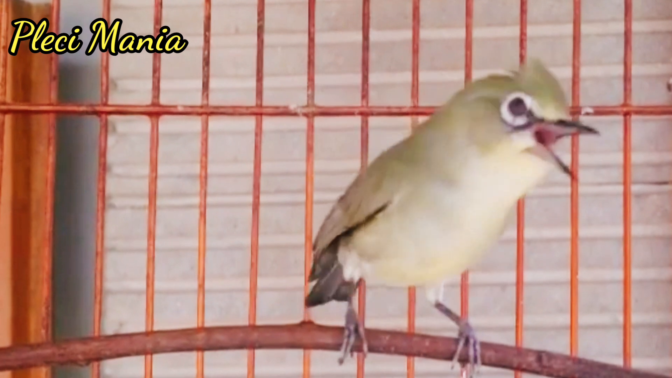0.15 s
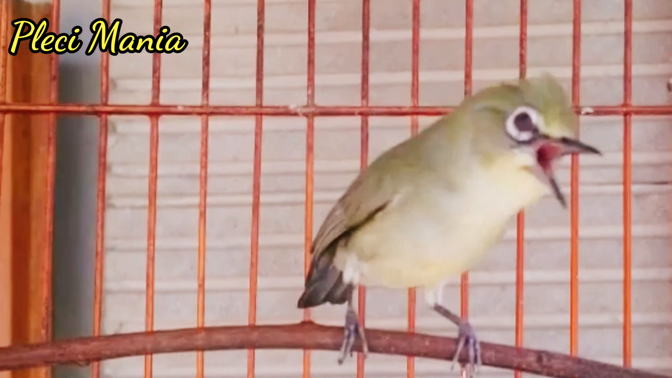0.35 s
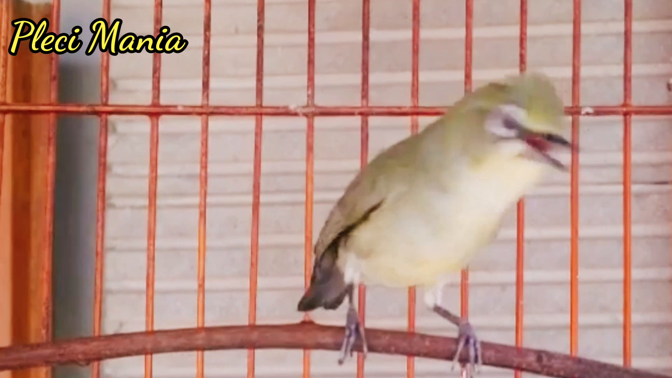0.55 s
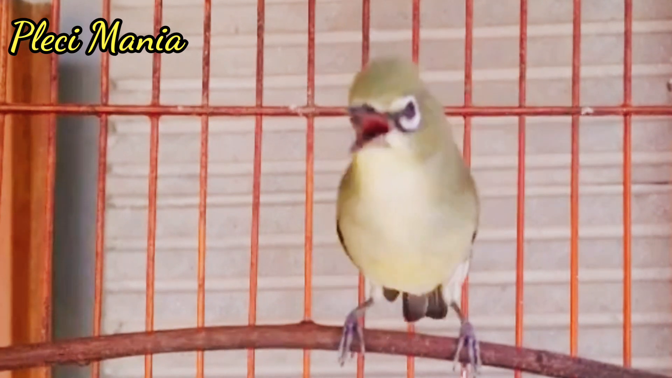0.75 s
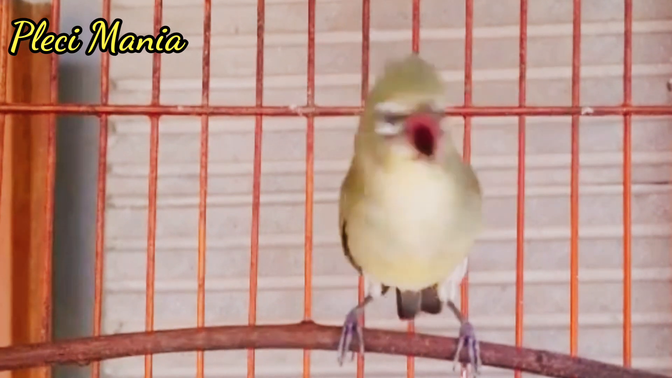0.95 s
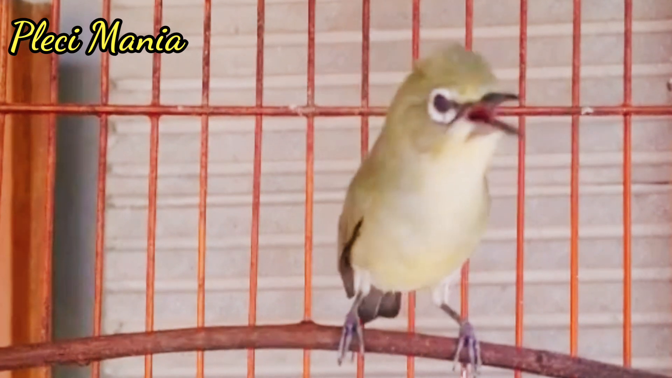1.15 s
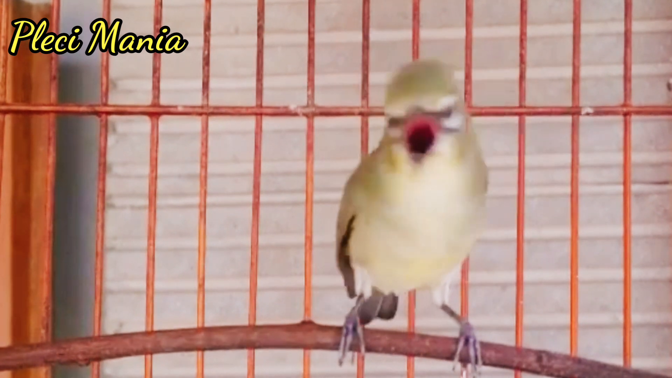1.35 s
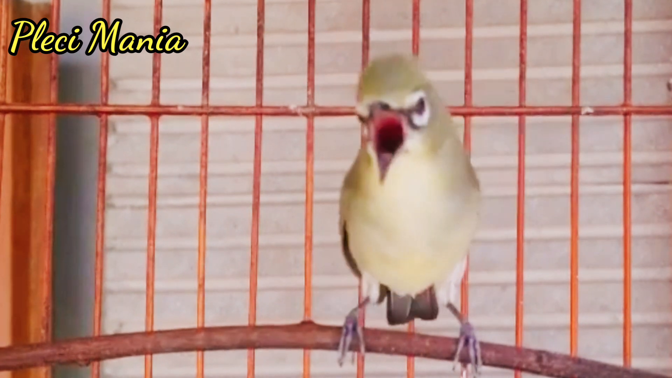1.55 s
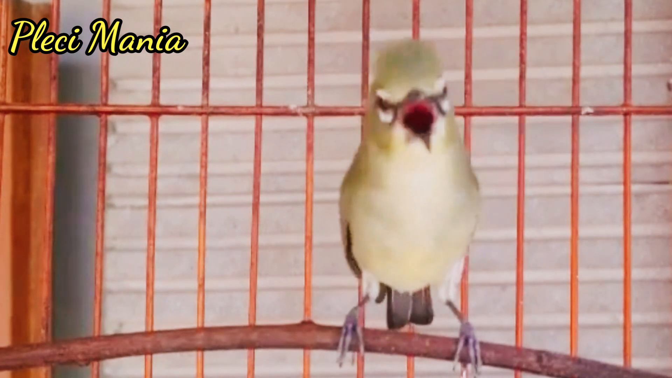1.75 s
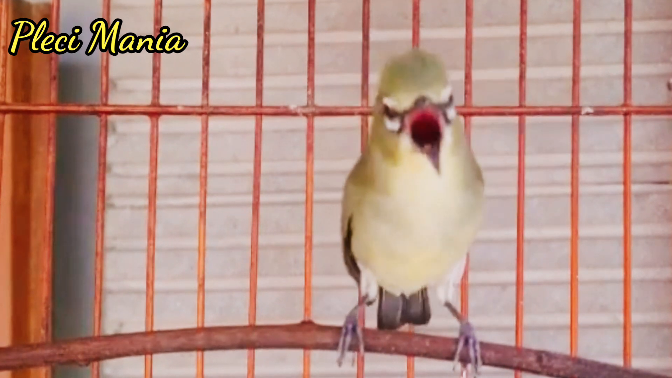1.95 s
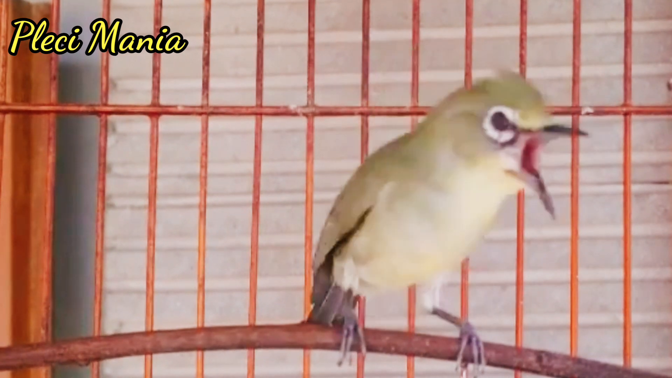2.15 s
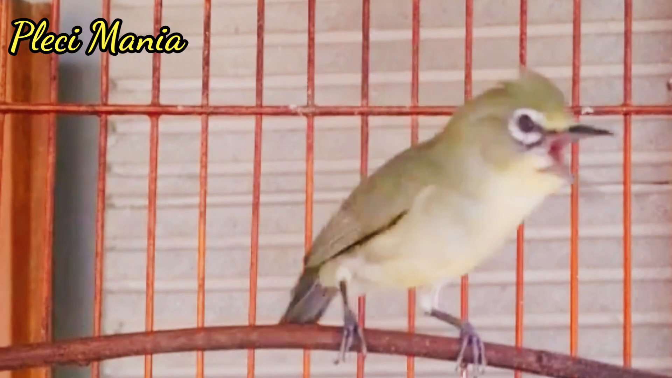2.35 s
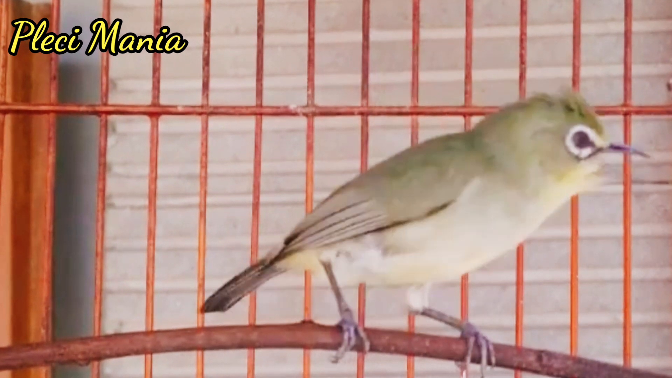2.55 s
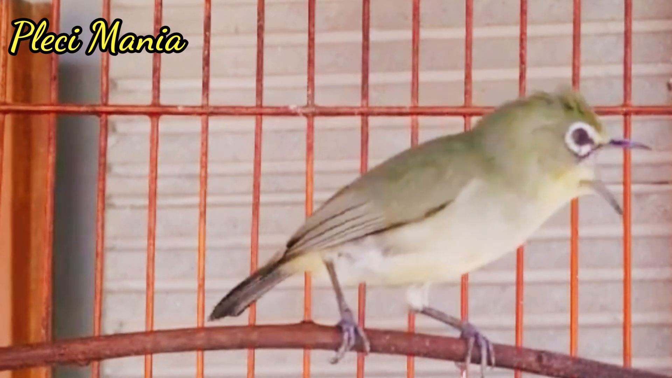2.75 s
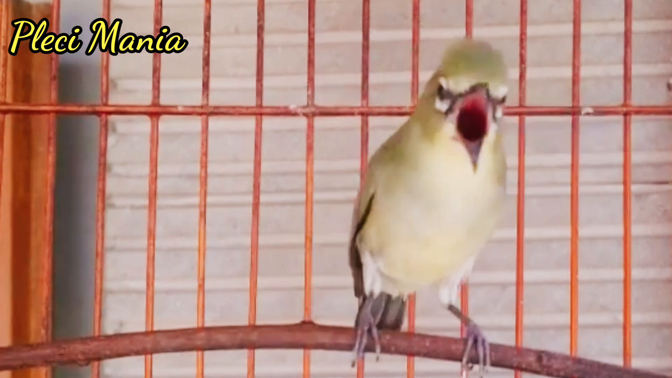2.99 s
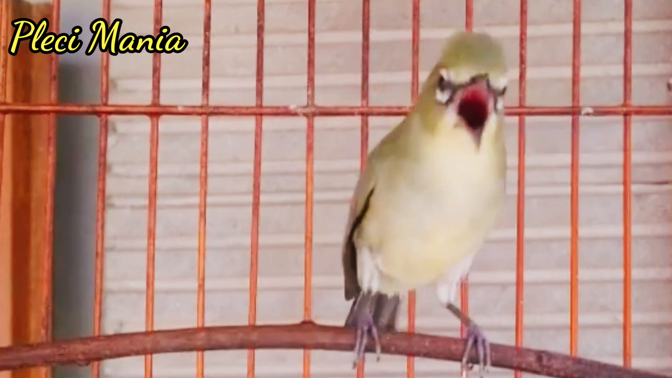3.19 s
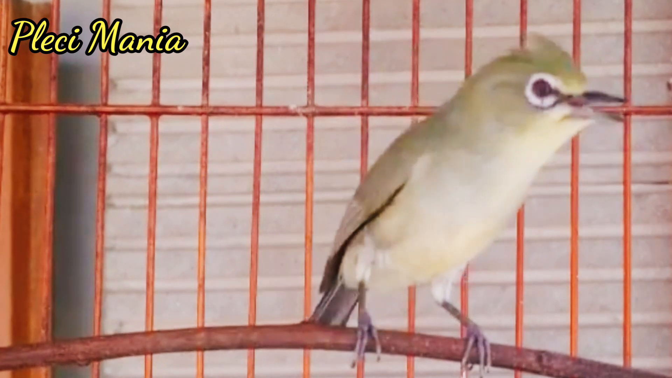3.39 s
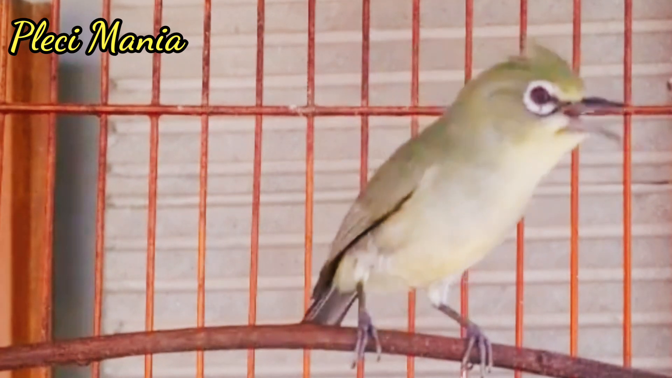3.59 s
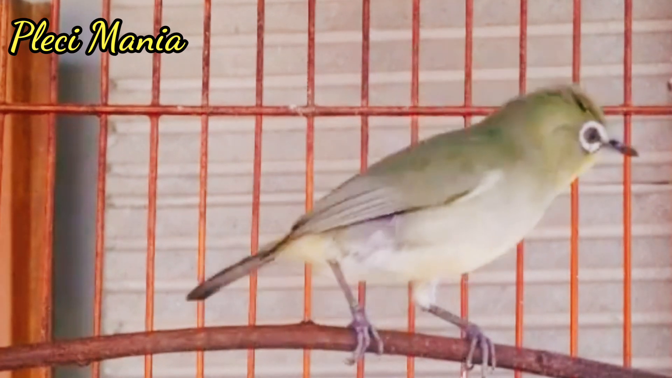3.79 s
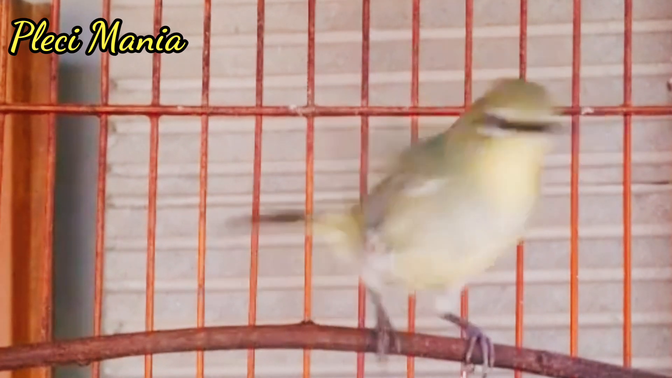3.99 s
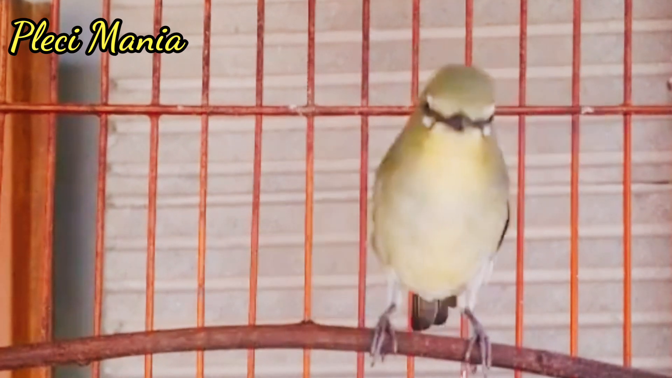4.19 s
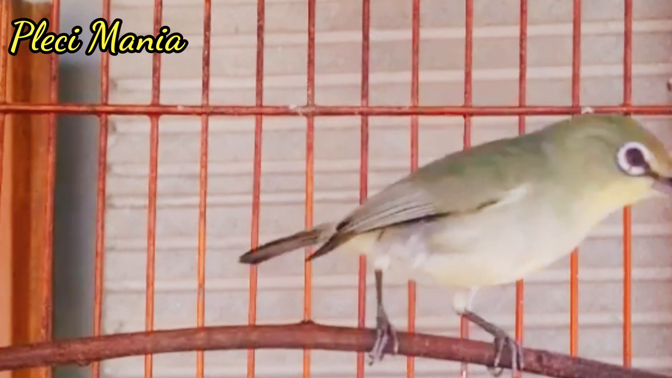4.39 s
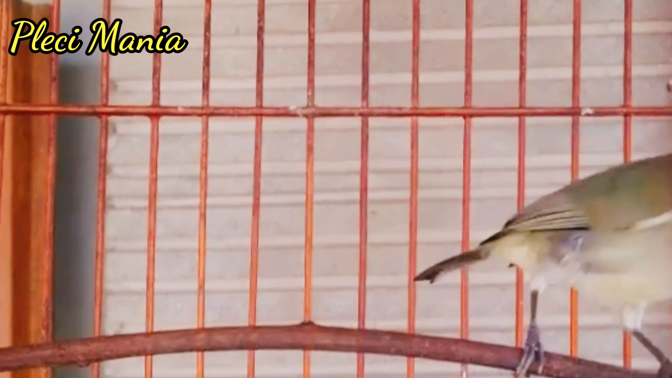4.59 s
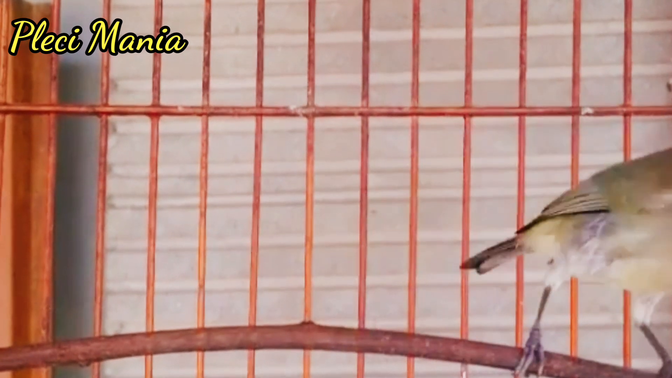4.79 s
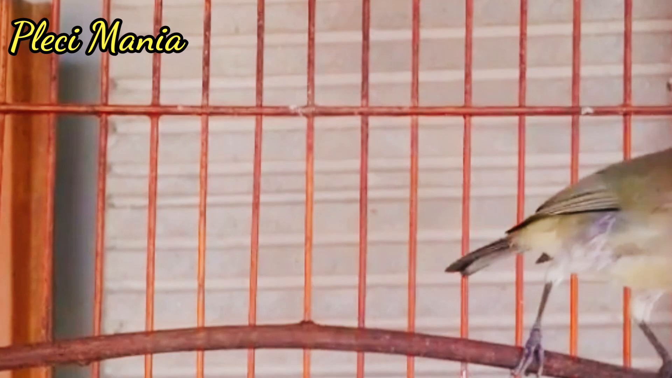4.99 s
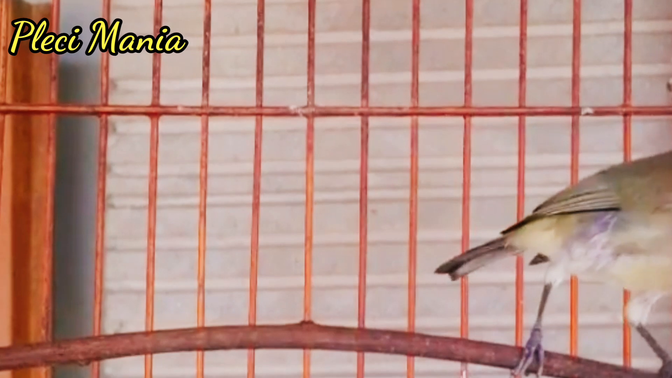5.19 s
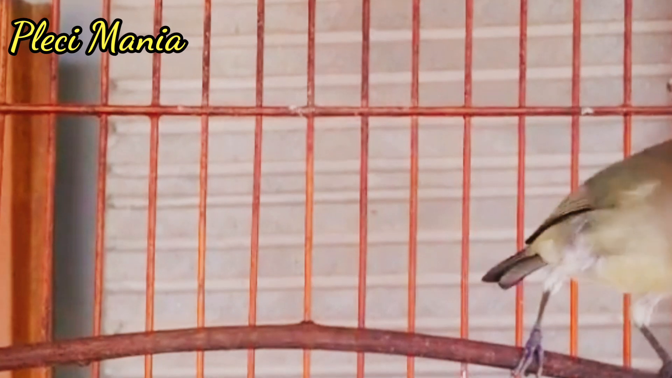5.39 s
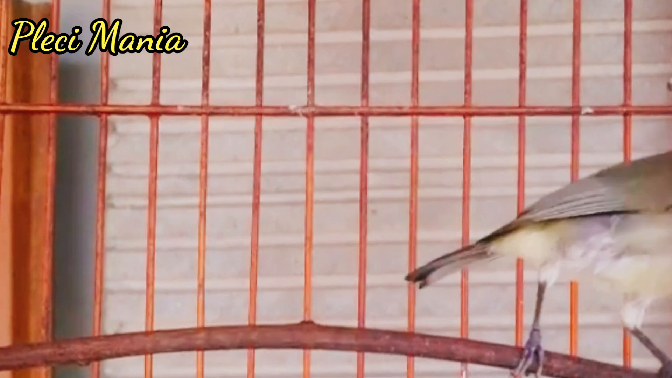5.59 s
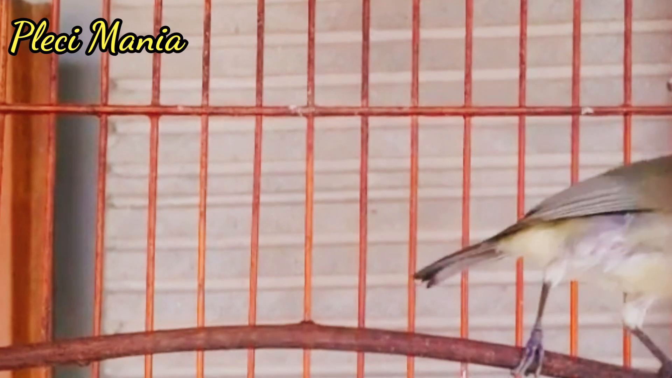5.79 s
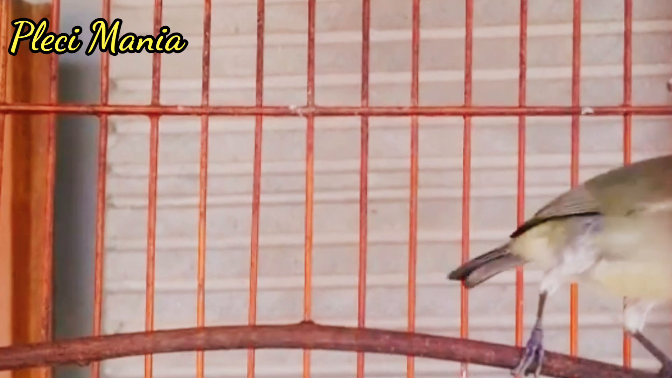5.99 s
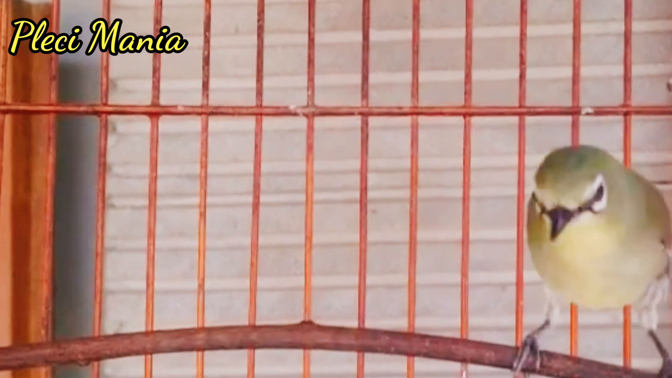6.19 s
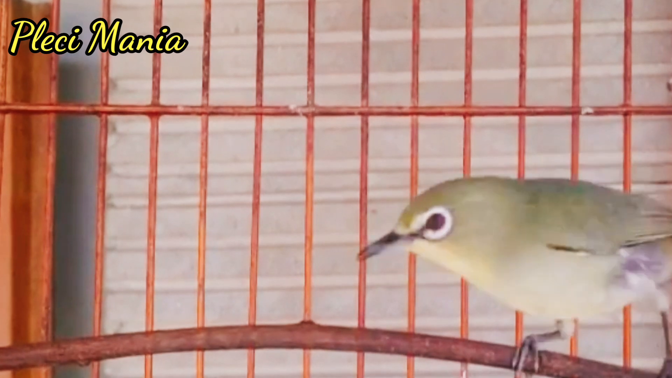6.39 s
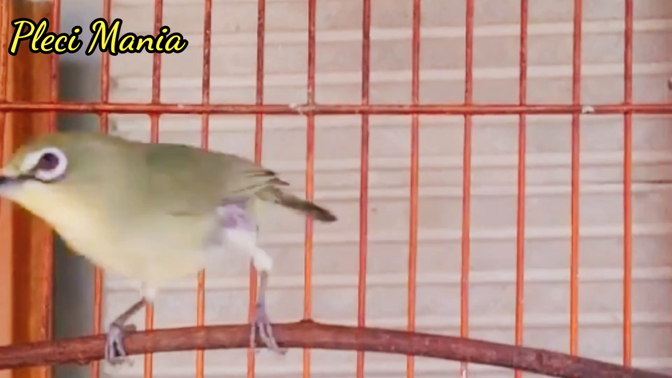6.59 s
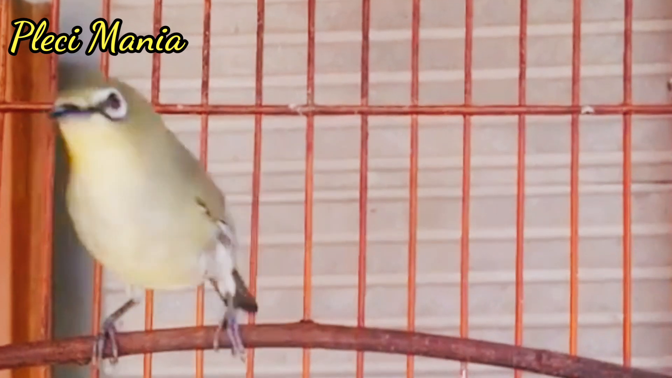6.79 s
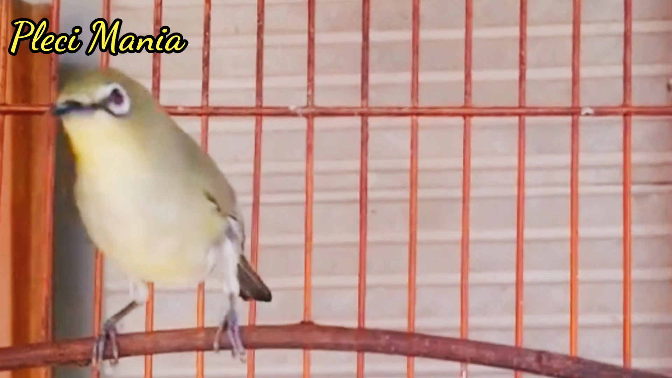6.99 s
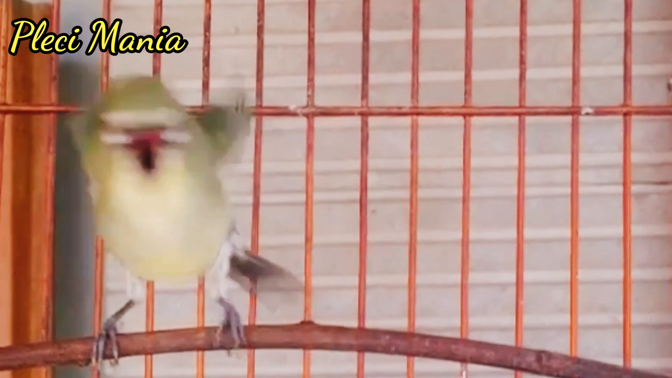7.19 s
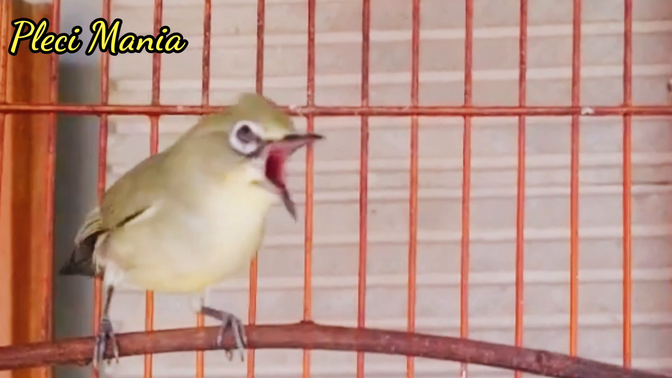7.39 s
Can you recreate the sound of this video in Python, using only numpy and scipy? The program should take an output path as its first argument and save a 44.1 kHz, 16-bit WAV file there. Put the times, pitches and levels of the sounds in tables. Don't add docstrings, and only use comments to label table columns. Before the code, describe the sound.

Quick piercing bird whistles swoop downward for almost four seconds, then quiet street hum, faraway chirps and soft wing flicks before one new note.

```python
import sys
import numpy as np
from scipy import signal
from scipy.fft import rfft, irfft, next_fast_len
from scipy.io import wavfile
from scipy.ndimage import uniform_filter1d

SR = 44100
rng = np.random.default_rng(int(sys.argv[2]) if len(sys.argv) > 2 else 0)


def digitize_waveform(pressure):
    field = np.atleast_2d(pressure).T
    bounded = np.clip(field, -1, 1)
    quanta = np.round(bounded * 32767).astype(np.int16)
    wavfile.write(sys.argv[1], SR, quanta)


def makeup_ratio(level_db):
    decades = np.asarray(level_db, float) / 20
    return 10 ** decades


N = 328545
TIME = np.arange(N) / SR
FAST = next_fast_len(N)
BINS = np.fft.rfftfreq(FAST, 1 / SR)
PORT_LAG_S = .00041


def on_log(table, hz):
    f, *columns = np.transpose(table)
    log_hz = np.log(np.maximum(hz, 1))
    return [np.interp(log_hz, np.log(f), column) for column in columns]


def walk(rate):
    hold = int(SR / rate)
    levels = rng.standard_normal(N // 20)[:N // hold + 1]
    smooth = uniform_filter1d(uniform_filter1d(np.repeat(levels, hold), hold), hold)
    return 1.3 * smooth[:N]


def bird():
    # [onset t/s, opening f/Hz, top of the opening flick f/Hz]
    openings = [(.204, 3300, 9300), (.432, 9000, 8800), (.632, 3200, 7800), (.824, 2900, 7600),
                (.975, 2900, 6100), (1.11, 3300, 7500), (1.284, 2700, 3000), (1.491, 9400, 8900),
                (1.702, 2900, 6900), (1.871, 3000, 3200), (2.076, 9600, 9000), (2.315, 2900, 9000),
                (2.519, 2900, 7500), (2.767, 3600, 8200), (2.945, 3300, 7000), (3.176, 3000, 7200),
                (3.387, 3000, 6800), (3.645, 3000, 9000), (7.383, 3000, 8000)]
    # [start level/dB, change to the end/dB, extra swell in the middle/dB]
    breaths = [(-13.5, -1, -2.5), (-18, -2.5, 4.5), (-15.5, 1, -3), (-20, 4, 4), (-14, -7.5, -.5),
               (-16, -4.5, 1.5), (-18, -4, 2.5), (-17.5, -2.5, 2), (-14.5, 1, -2), (-15, -4, -1.5),
               (-15.5, -7, 2), (-19, 3.5, 1.5), (-18, -8.5, 6), (-25, -4, 9), (-21.5, 3, 3.5),
               (-19.5, -7, 8.5), (-16.5, -7, 5), (-15, -5, 0), (-16, 0, 0)]
    # [left minus right level/dB, left leads by phase/rad]
    beak = [(-.7, -1.6), (-.5, -1.6), (-.1, -1.65), (2.2, -.05), (2, -.2), (.7, -.5), (-1.3, -1.1),
            (.8, -.4), (1.5, .05), (1, -.1), (.7, -.27), (-1, -1.55), (-4.2, -2.3), (-5, -3), (-2, -1.55),
            (.7, -.9), (-.7, -1.5), (-1.5, -2.15), (3, .9)]
    # [t/s, whistle f/Hz]
    early = [
        [(0.218, 7820), (0.235, 7060), (0.242, 6050), (0.26, 5430), (0.343, 4590), (0.365, 4650)],
        [(0.442, 8310), (0.457, 7320), (0.487, 7080), (0.495, 6180), (0.506, 5900), (0.528, 6090),
         (0.538, 5190), (0.559, 4870), (0.588, 5020)],
        [(0.639, 7600), (0.648, 6760), (0.659, 6550), (0.666, 5300), (0.692, 4970), (0.702, 4440), (0.74, 3940),
         (0.763, 4130)],
        [(0.833, 7710), (0.836, 7300), (0.85, 6800), (0.861, 5880), (0.879, 5280), (0.885, 5790), (0.893, 4840),
         (0.939, 4090)],
        [(0.983, 6400), (0.99, 6140), (0.995, 5560), (1.0, 5620), (1.006, 4800), (1.035, 3850), (1.059, 3640)],
        [(1.118, 6910), (1.127, 6270), (1.131, 6460), (1.141, 5170), (1.181, 5150), (1.187, 4540),
         (1.201, 4590), (1.209, 4090), (1.232, 4180)],
    ]
    # [t/s, whistle f/Hz]
    middle = [
        [(1.292, 3230), (1.313, 4110), (1.349, 4220), (1.354, 4610), (1.367, 4670), (1.383, 4200),
         (1.392, 5170), (1.403, 5400), (1.415, 4840)],
        [(1.512, 7560), (1.517, 7470), (1.529, 5880), (1.539, 5770), (1.543, 5250), (1.618, 4200),
         (1.633, 4160)],
        [(1.711, 7150), (1.737, 6240), (1.743, 5640), (1.766, 5210), (1.774, 5710), (1.789, 5360),
         (1.793, 4780), (1.804, 4590), (1.818, 3960)],
        [(1.879, 3250), (1.889, 3510), (1.893, 4010), (1.934, 4010), (1.944, 4690), (1.959, 4780),
         (1.979, 4090), (1.989, 5320), (1.999, 5100)],
        [(2.09, 8230), (2.105, 7280), (2.114, 5940), (2.124, 5810), (2.131, 5230), (2.216, 4110)],
        [(2.329, 7430), (2.339, 6500), (2.35, 6220), (2.357, 6520), (2.361, 7820), (2.44, 5100), (2.455, 4330)],
    ]
    # [t/s, whistle f/Hz]
    late = [
        [(2.53, 7900), (2.551, 6930), (2.562, 5000), (2.604, 4180), (2.622, 4200), (2.628, 5380), (2.648, 5770),
         (2.655, 5060), (2.68, 4900)],
        [(2.776, 7800), (2.792, 7260), (2.811, 5580), (2.815, 6270), (2.819, 6270), (2.828, 5660),
         (2.863, 4890), (2.871, 5250), (2.881, 5170)],
        [(2.953, 7300), (2.954, 7080), (2.974, 6910), (2.976, 6220), (2.99, 5620), (3.025, 5060), (3.033, 5380),
         (3.085, 4260), (3.09, 4390)],
        [(3.187, 8400), (3.207, 7040), (3.212, 7170), (3.22, 6120), (3.226, 5770), (3.247, 5920), (3.254, 5250),
         (3.311, 4180)],
        [(3.395, 6850), (3.4, 6330), (3.442, 5210), (3.459, 5320), (3.468, 6310), (3.479, 6090), (3.495, 5280),
         (3.526, 4480), (3.548, 4370)],
        [(3.663, 7800), (3.674, 7670), (3.681, 6870), (3.689, 6500), (3.782, 5020)],
        [(7.392, 7920), (7.402, 7770), (7.415, 6440), (7.43, 5860), (7.47, 5500)],
    ]
    # [f/Hz, left minus right level/dB, left leads by phase/rad]
    port_differences = [(3700, 3, -.5), (4250, 6.5, -.5), (4750, 3, -.7), (5250, 1, -.3), (5750, -2, .2),
                        (6150, 2, 1.0), (6500, 4, .6), (6850, 1, -.5), (7250, -5.5, .2), (7700, 3.5, 1.2),
                        (9000, -1, 1.2), (12000, -3, 2.2)]
    # [whistle f/Hz, level/dB]
    undertone = [(3500, -62), (5500, -60), (7400, -42), (8200, -14), (9000, -3)]
    # [multiple of the whistle, level/dB]
    overtones = [(2, -37), (3, -44)]
    flick_s, flick_knee = .006, .24
    fade_s = .003
    out = np.zeros((2, N))
    side = np.array([[.5], [-.5]])
    waver = 1 + .007 * walk(220)
    flutter_db = 1.5 * walk(130)
    rasp = walk(900)
    broken_db = 3.5 * walk(90)
    trill_hz = 92 * (1 + .1 * walk(30))
    trill = 1 + .032 * np.sin(2 * np.pi * np.cumsum(trill_hz) / SR)
    for n, (opening, breath, tune, heading) in enumerate(zip(openings, breaths, early + middle + late, beak)):
        onset_s, from_hz, top_hz = opening
        turn_db, turn_rad = heading
        knee_hz = from_hz + flick_knee * (top_hz - from_hz)
        flick_points = [(onset_s, from_hz), (onset_s + flick_s / 2, knee_hz), (onset_s + flick_s, top_hz)]
        s, hz = np.transpose(flick_points + list(tune))
        end_s = s[-1]
        at = slice(int(onset_s * SR), min(int((end_s + fade_s) * SR), N))
        t = TIME[at]
        hz = uniform_filter1d(np.interp(t, s, hz), size=60)
        flick = np.clip(np.gradient(hz) / 12, 0, 1) * np.exp(-(t - onset_s) / .02)
        gain = np.sqrt(2) * makeup_ratio(effort(t, hz, onset_s, end_s, *breath) + flutter_db[at])
        gain *= np.clip((end_s + fade_s - t) / fade_s, 0, 1)
        gain *= np.clip((t - onset_s) / .002, 0, 1)
        hz = hz * waver[at]
        if n in (6, 9):
            hz *= trill[at] ** np.exp(-((hz - 4000) / 350) ** 2)
        phase = 2 * np.pi * np.cumsum(hz) / SR
        under_db = on_log(undertone, hz)[0]
        partials = [(1, 0), (.5, under_db), (1.5, np.maximum(under_db - 15, -60))] + overtones
        for k, part_db in partials:
            pan_db, lead = on_log(port_differences, k * hz)
            weak = k != 1
            wobble = (weak * (.38 + .38 * k) + 1.2 * flick) * rasp[at]
            weak_db = weak * (broken_db[at] - 9 * flick * (k > 1))
            size = gain * makeup_ratio(part_db + weak_db + side * (pan_db + turn_db))
            size = size * (k * hz < .45 * SR)
            out[:, at] += size * np.sin(k * phase + side * (lead + turn_rad) + wobble)
    return out


def effort(t, hz, onset_s, end_s, db, change_db, middle_db):
    # [whistle f/Hz, level/dB]
    throat = [(2800, -28), (3400, -7.5), (4000, -2), (5900, .5), (6600, -1), (7300, -1), (7900, -10),
              (9500, -24)]
    u = (t - onset_s) / (end_s - onset_s)
    attack = -32 * np.exp(-(t - onset_s) / .0045)
    release = -9 * np.exp((t - end_s) / .005)
    comb = -8 * np.abs(np.cos(np.pi * (hz - 4800) / 1660)) ** 8.5
    jump_khz_per_ms = np.clip(np.abs(np.gradient(hz)) * SR / 1e6, 0, .6)
    settled = np.clip((t - onset_s) / .006 - 1, 0, 1)
    leap = -16 * jump_khz_per_ms * settled
    arch = db + change_db * u + middle_db * np.sin(np.pi * u)
    return arch + attack + release + comb + leap + on_log(throat, hz)[0]


def low_rumble(song):
    loud = np.sqrt(uniform_filter1d(np.mean(song ** 2, axis=0), size=1200).clip(0))
    low = signal.butter(1, (35, 125), "band", fs=SR, output="sos")
    rumble = signal.sosfilt(low, rng.standard_normal(N) + .5 * rng.standard_normal((2, N)))
    return makeup_ratio(-32 + 3 * walk(6)) * loud * rumble, loud


def echoes(x, start_s, t60_s, db, rise_s=.004):
    t = np.arange(SR // 2) / SR
    tail = rng.standard_normal((2, SR // 2)) * makeup_ratio(-60 * t / t60_s)
    tail *= np.clip((t - start_s) / rise_s, 0, 1)
    tail *= makeup_ratio(db) / np.sqrt(np.sum(tail ** 2, axis=1, keepdims=True))
    return signal.fftconvolve(np.atleast_2d(x), tail, axes=1)[:, :N]


def patchy(x, depth_db):
    z = signal.stft(x, nperseg=512)[2]
    patch = uniform_filter1d(rng.standard_normal(z.shape[1:]), size=5, axis=0)
    patch = uniform_filter1d(patch, size=9, axis=1)
    return signal.istft(z * makeup_ratio(depth_db * patch / patch.std()), nperseg=512)[1][:, :N]


def wings():
    # [t/s, level/dB]
    flicks = [
        (4.42, -72),
        (5.4, -72),
        (6.15, -66),
        (6.39, -69),
        (6.46, -72),
    ]
    shape = sum(makeup_ratio(db) * np.exp(-((TIME - s) / .02) ** 2) for s, db in flicks)
    band = signal.butter(1, (500, 5000), "band", fs=SR, output="sos")
    return shape * signal.sosfilt(band, rng.standard_normal(N) + .6 * rng.standard_normal((2, N)))


def far_birds():
    # [t/s, length/s, start f/Hz, end f/Hz, level/dB]
    calls = [(.03, .11, 7700, 5600, -53.5), (3.92, .1, 4600, 4500, -62), (3.95, .19, 7800, 5550, -57),
             (4.18, .1, 5300, 4100, -54), (3.76, .2, 5200, 3700, -63), (4.7, .1, 5900, 5400, -68.5),
             (5.05, .1, 6600, 6000, -72), (5.35, .1, 7000, 6300, -71), (5.6, .12, 4900, 4500, -64),
             (5.85, .1, 8000, 6900, -64.5), (6.2, .1, 6700, 6200, -70), (6.35, .14, 5900, 5300, -66),
             (6.8, .08, 7200, 6500, -72.5), (6.92, .09, 5500, 5300, -71.5), (7.02, .1, 7700, 6800, -69.5),
             (7.22, .11, 5700, 4700, -64.5)]
    out = np.zeros(N)
    slur = 1 + .022 * walk(260)
    for s, length, from_hz, to_hz, db in calls:
        at = slice(int(s * SR), int((s + length) * SR))
        u = np.clip((TIME[at] - s) / length, 0, 1)
        hz = (to_hz + (from_hz - to_hz) * (1 - u) ** 1.8) * slur[at]
        swell = np.sqrt(np.sin(np.pi * u).clip(0))
        out[at] += makeup_ratio(db) * swell * np.sin(2 * np.pi * np.cumsum(hz) / SR)
    return echoes(out, .002, .7, 2.5, rise_s=.012)


def vehicle():
    passes_s, pass_width_s = 5.55, .1
    leaving = (TIME - passes_s) / np.hypot(TIME - passes_s, pass_width_s)
    whine_hz = 1670 * (1 - .075 * leaving)
    firing_hz = 100 * (1 - .04 * leaving)
    whine_db = -71 - 22 * (TIME - 5.65) ** 2
    drone_db = -60 - 20 * np.abs(TIME - 6.1)
    whine_phase = 2 * np.pi * np.cumsum(whine_hz * (1 + .015 * walk(40))) / SR
    whine = makeup_ratio(whine_db + 4 * walk(14)) * np.sin(whine_phase)
    turn = 2 * np.pi * np.cumsum(firing_hz * (1 + .03 * walk(12))) / SR
    # (multiple of the firing rate, dB)
    drone = sum(makeup_ratio(db + 4 * walk(9)) * np.sin(k * turn) for k, db in [(1, -1), (1.5, -4.5), (2, -3)])
    return opposed(whine + makeup_ratio(drone_db - 6) * drone)


def opposed(x):
    return np.array([np.interp(TIME - PORT_LAG_S, TIME, x), -x])


def street():
    # [t/s, level/dB]
    traffic = [(0, -73), (.6, -78), (2.4, -80), (3.0, -75), (3.7, -72), (4.0, -72.5), (4.15, -78),
               (4.6, -77), (5.55, -68), (6.4, -69.5), (6.6, -78), (7.45, -79.5)]
    # [f/Hz, level/dB per Hz]
    roar_colour = [(30, -30), (65, -10), (150, -9), (260, -14), (500, -22), (1000, -22), (1700, -20),
                   (2900, -25), (4700, -20.5), (7000, -30), (9000, -43), (14000, -64)]
    # [f/Hz, level/dB per Hz]
    air_colour = [(18, -52.5), (30, -29.5), (60, 1), (172, -6.5), (1420, -42), (2560, -37.5), (4630, -48.5),
                  (5400, -29), (5830, -40), (7540, -37), (14000, -56.5)]
    # [t/s, half length/s, f/Hz, level/dB]
    body_knock = (6.1, .09, 147, -68)
    roar_db = np.interp(TIME, *np.transpose(traffic)) + 1.5
    roar = wide_noise(roar_colour, (700, 2300)) * makeup_ratio(roar_db)
    air = wide_noise(air_colour, (30, 14000)) * makeup_ratio(-67.5 + 3.5)
    s, half_s, hz, db = body_knock
    knock = makeup_ratio(db) * np.exp(-((TIME - s) / half_s) ** 2) * np.sin(2 * np.pi * hz * TIME)
    return patchy(roar + air, 2.2) + knock


def wide_noise(colour, ref_hz):
    # [f/Hz, share common to both]
    likeness = [(60, .97), (280, .95), (600, .75), (1300, .6), (3000, .4), (8000, .2)]
    share = np.clip(on_log(likeness, BINS)[0], 0, 1)
    common, *apart = rfft(rng.standard_normal((3, FAST)))
    left_delay = np.exp(-2j * np.pi * BINS * PORT_LAG_S)
    right_flip = -np.exp(-.5 * 1j) * np.ones_like(BINS)
    common = common * np.array([left_delay, right_flip])
    gain = makeup_ratio(on_log(colour, BINS)[0])
    in_band = (BINS > ref_hz[0]) & (BINS < ref_hz[1])
    gain /= np.sqrt(np.sum(gain[in_band] ** 2) / len(BINS))
    mixed = np.sqrt(share) * common + np.sqrt(1 - share) * np.array(apart)
    return irfft(gain * mixed, FAST)[:, :N]


def scene():
    song = bird()
    near_walls = echoes(song, .002, .1, -12.5)
    far_walls = patchy(echoes(song, .02, .42, -26), 5)
    rumble, loud = low_rumble(song)
    hold_s = .15
    held = signal.lfilter([1 / (hold_s * SR)], [1, 1 / (hold_s * SR) - 1], loud)
    balance = makeup_ratio(np.array([[-.4], [.6]]))
    outside = (vehicle() + street()) * balance / (1 + 2.5 * held)
    return song + near_walls + far_walls + rumble + far_birds() + wings() + outside


def band_limit(x):
    return signal.sosfilt(signal.butter(12, 14130, fs=SR, output="sos"), x)


def record(dry):
    wet = dry + .02 * dry ** 2
    wet = signal.sosfilt(signal.butter(2, 35, "high", fs=SR, output="sos"), wet)
    wet = signal.sosfilt(signal.ellip(8, .2, 50, 13200, fs=SR, output="sos"), wet)
    return band_limit(wet)


dry = scene()
out = record(dry)
digitize_waveform(out)
```